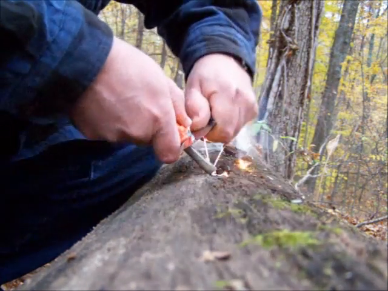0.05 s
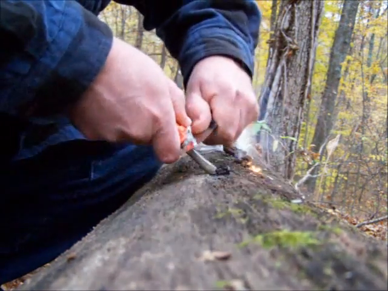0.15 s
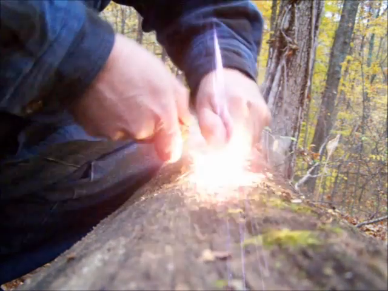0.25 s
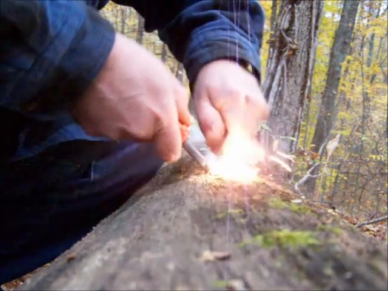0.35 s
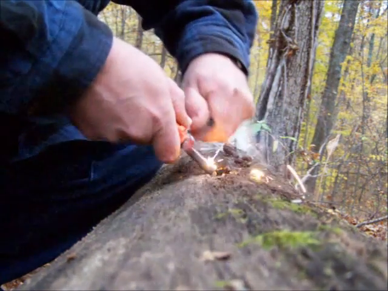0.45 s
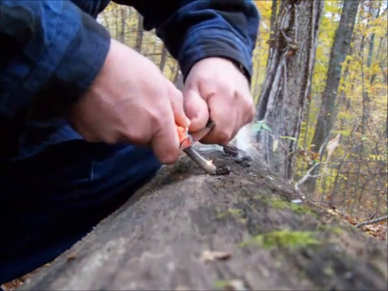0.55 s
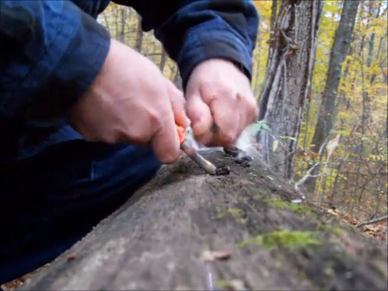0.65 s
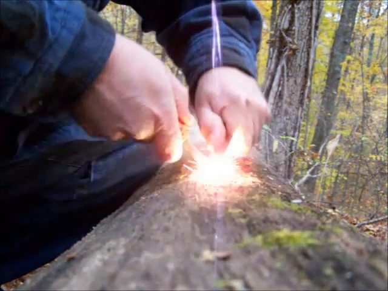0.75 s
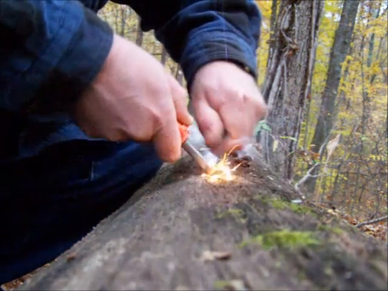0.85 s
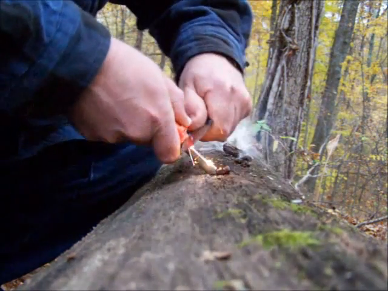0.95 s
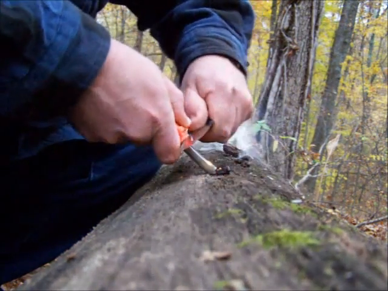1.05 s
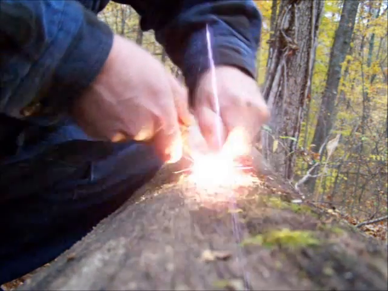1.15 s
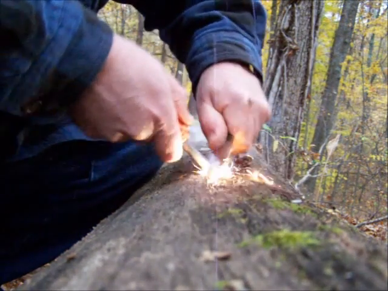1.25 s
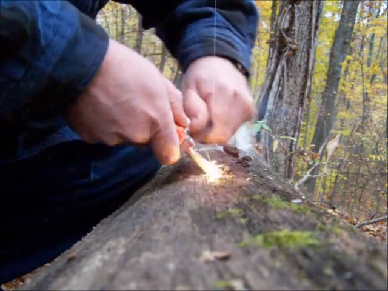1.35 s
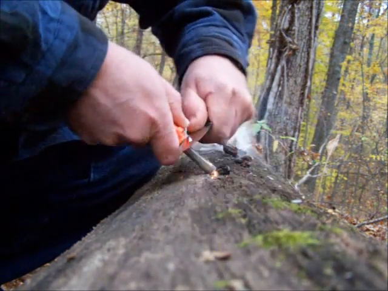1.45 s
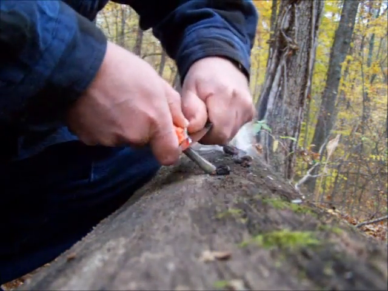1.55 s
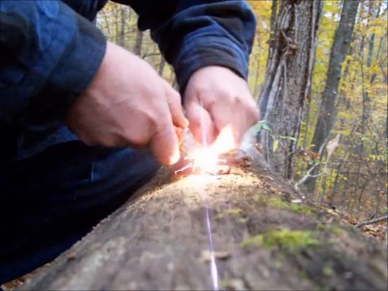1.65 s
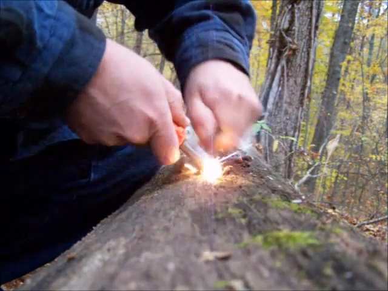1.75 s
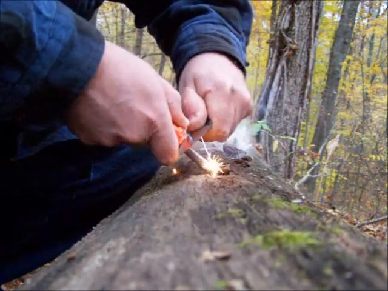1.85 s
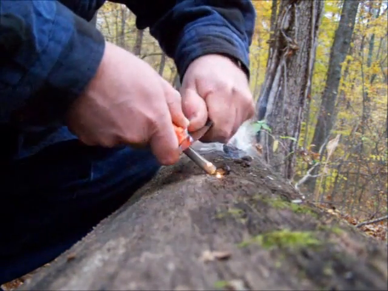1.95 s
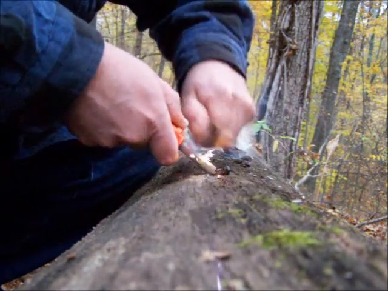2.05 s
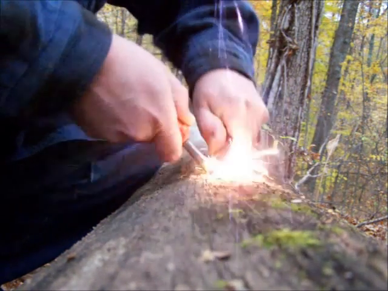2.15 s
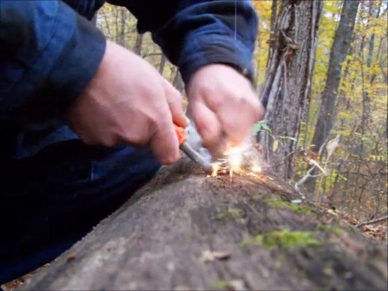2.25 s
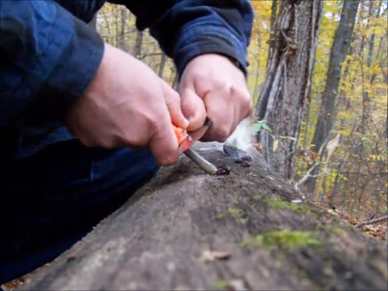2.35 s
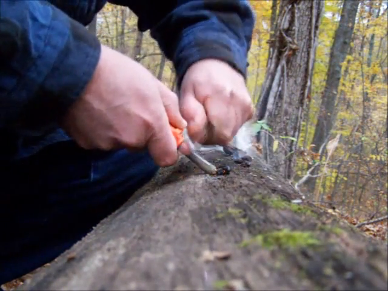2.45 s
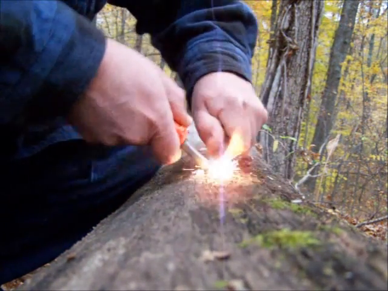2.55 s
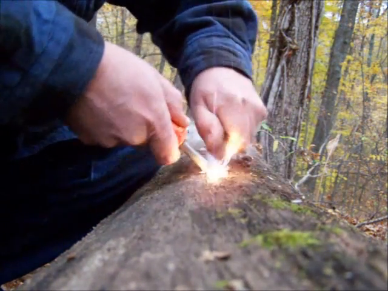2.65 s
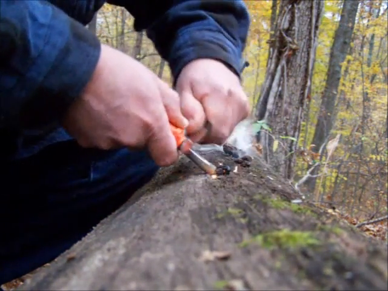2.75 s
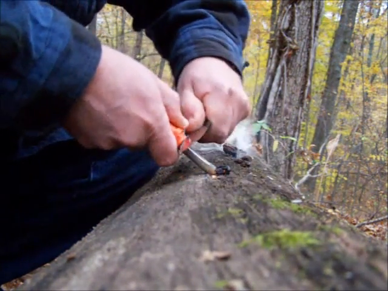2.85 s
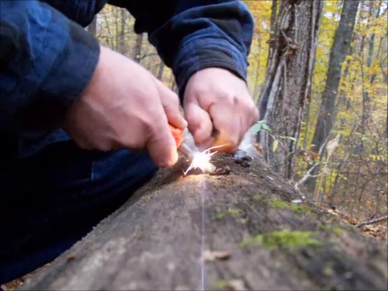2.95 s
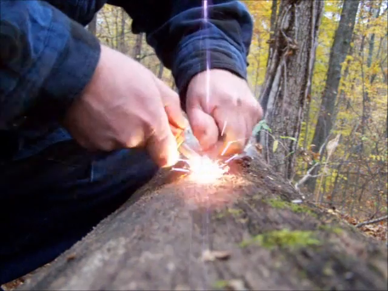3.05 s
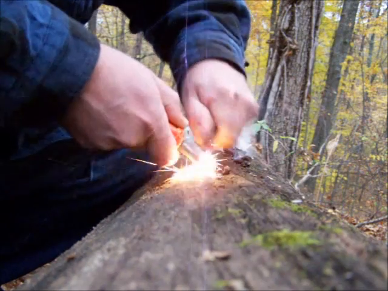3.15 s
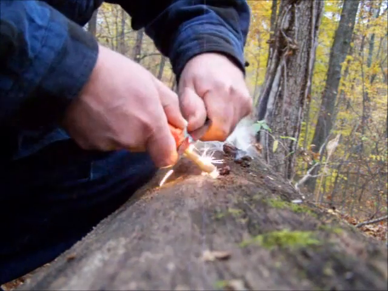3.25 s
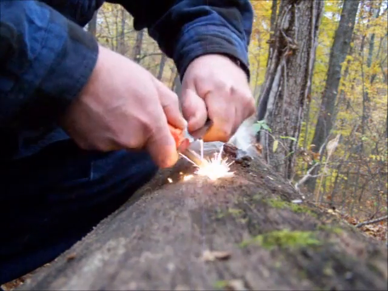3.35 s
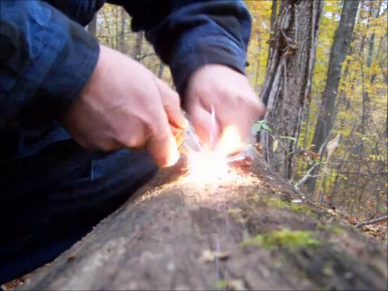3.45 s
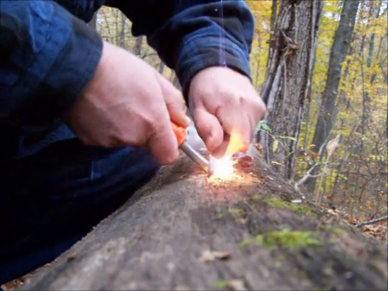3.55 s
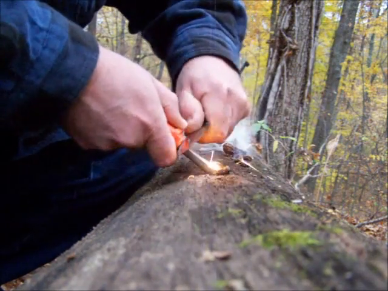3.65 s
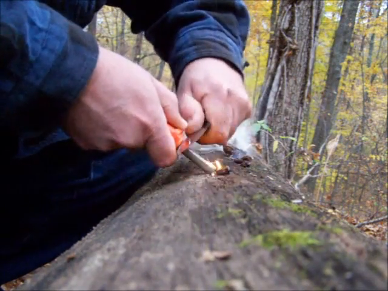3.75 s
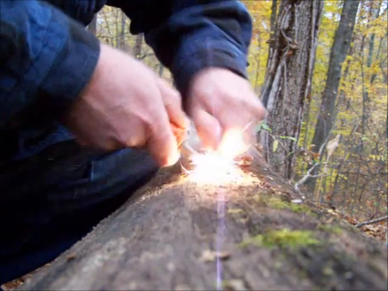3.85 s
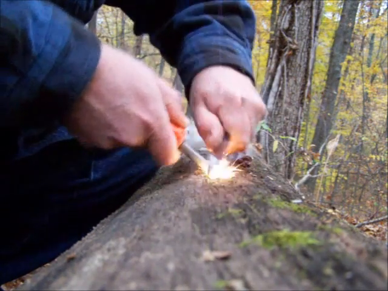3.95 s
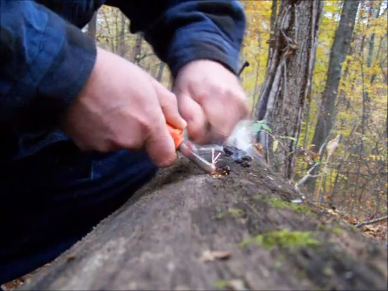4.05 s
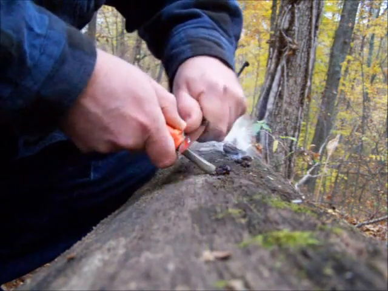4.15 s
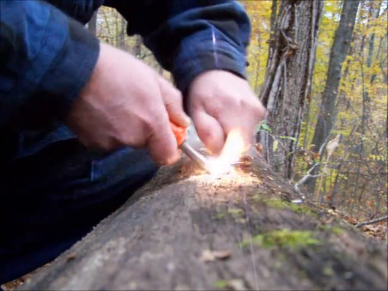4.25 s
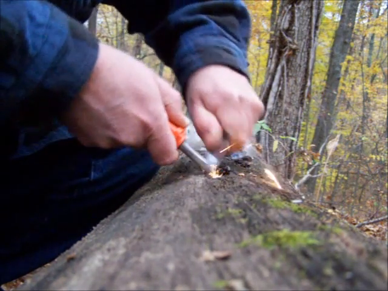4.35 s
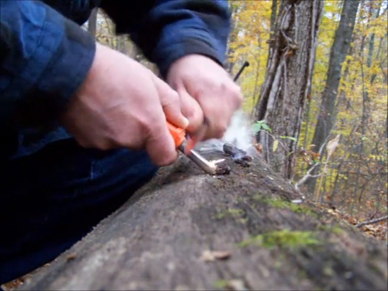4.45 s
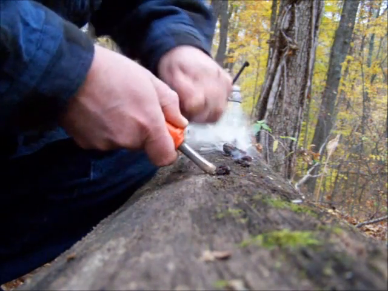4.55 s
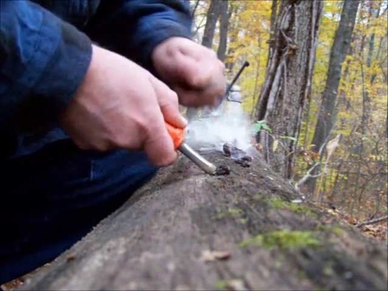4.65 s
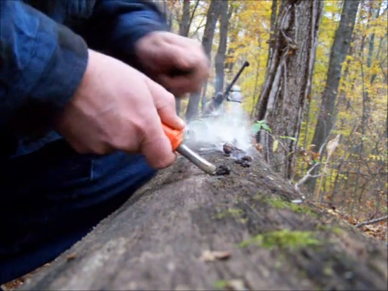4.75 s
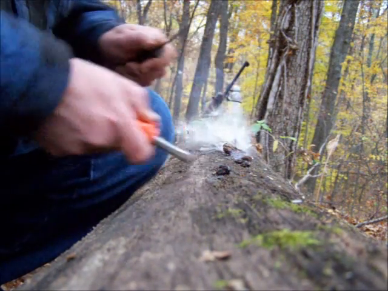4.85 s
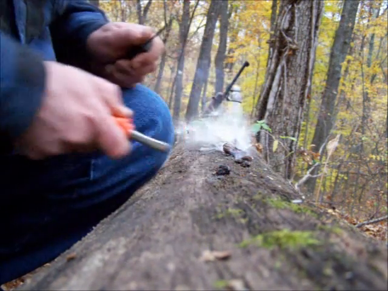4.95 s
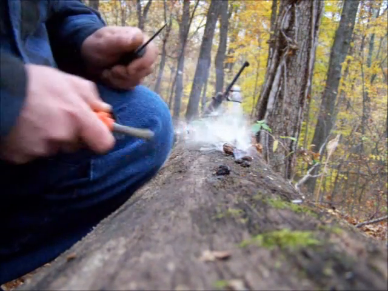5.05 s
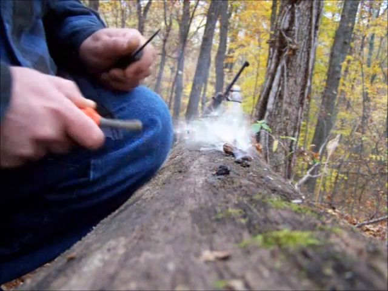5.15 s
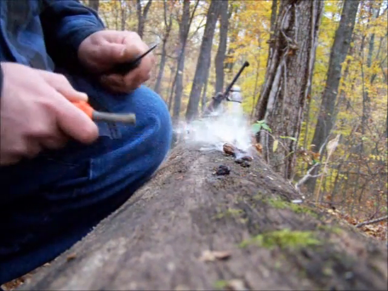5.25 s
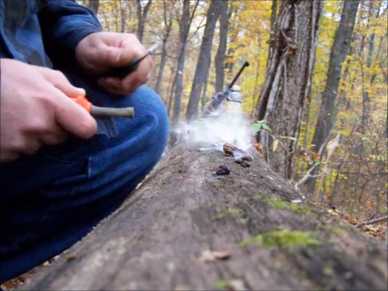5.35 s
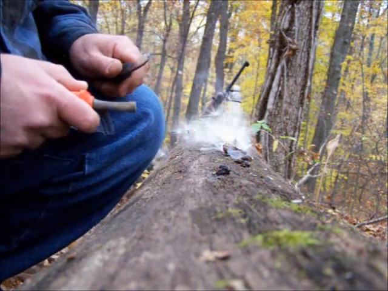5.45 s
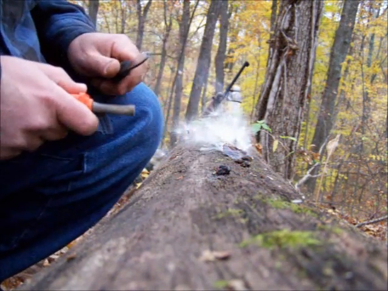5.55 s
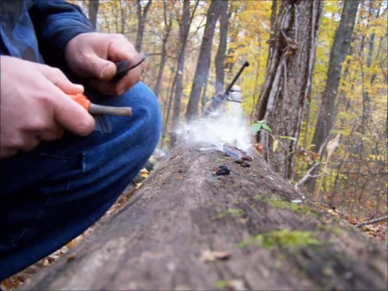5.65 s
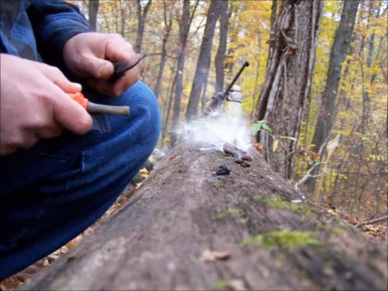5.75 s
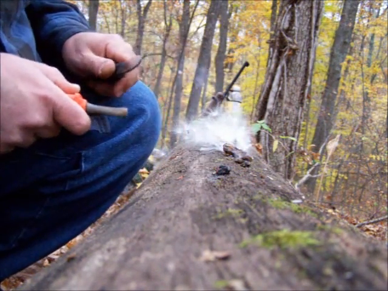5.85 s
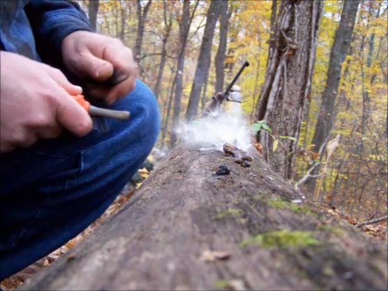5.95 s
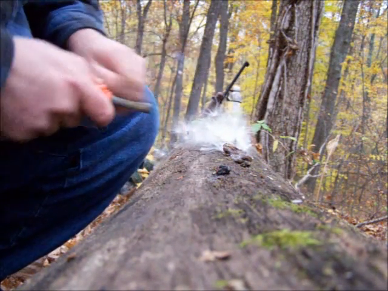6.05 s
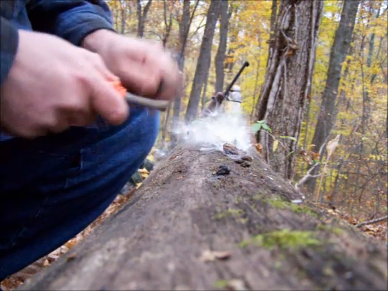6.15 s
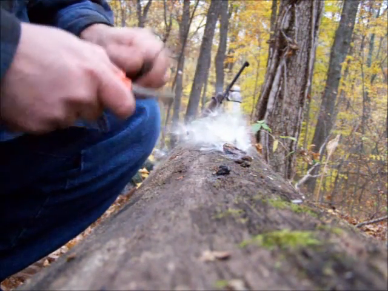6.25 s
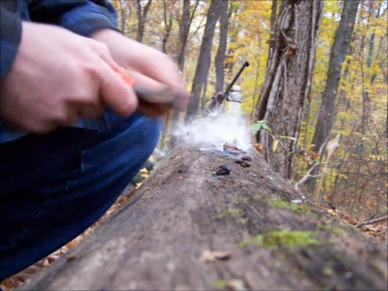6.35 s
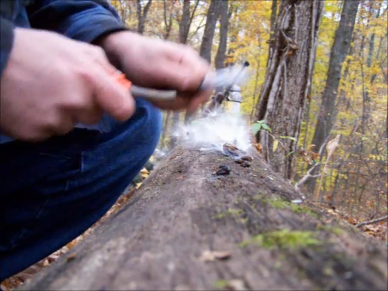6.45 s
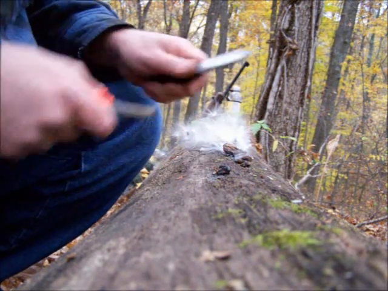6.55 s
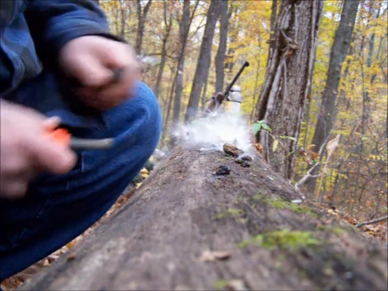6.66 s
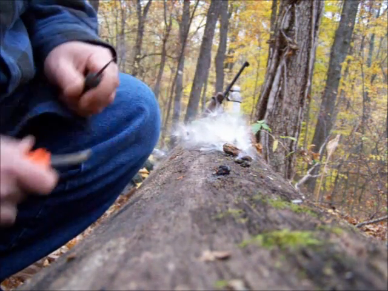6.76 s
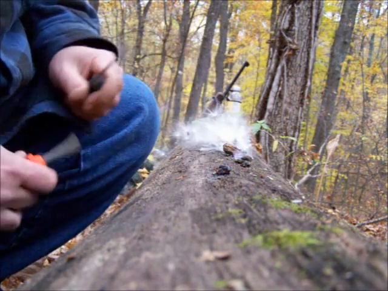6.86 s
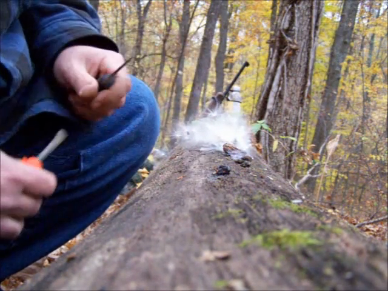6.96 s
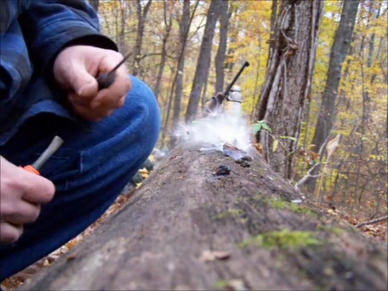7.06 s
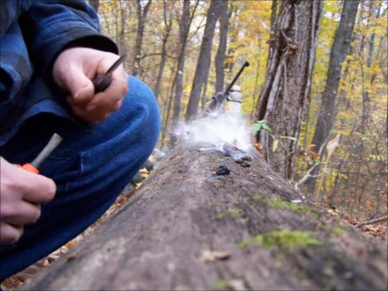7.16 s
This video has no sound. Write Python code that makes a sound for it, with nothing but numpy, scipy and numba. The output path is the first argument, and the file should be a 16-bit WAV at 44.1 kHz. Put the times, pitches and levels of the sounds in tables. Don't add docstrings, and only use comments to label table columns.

```python
import sys
import numpy as np
from scipy import signal
from scipy.io import wavfile
from scipy.ndimage import uniform_filter1d
from numba import njit

SR = 44100
rng = np.random.default_rng(int(sys.argv[2]) if len(sys.argv) > 2 else 0)


def undo_db(level):
    steps = np.asarray(level, float) / 20
    return 10 ** steps


def persist_wave(psi):
    counts = np.round(np.clip(psi, -1, 1) * 32767).astype(np.int16)
    wavfile.write(sys.argv[1], SR, np.atleast_2d(counts).T)


N = 318402


def unit(x):
    return x / np.sqrt(np.mean(x ** 2) + 1e-20)


def in_time(rows):
    s, *columns = np.transpose(rows)
    return [np.interp(np.arange(N) / SR, s, column) for column in columns]


def drift(rate_hz):
    r = np.exp(-40 * np.pi * rate_hz / SR)
    noise = rng.standard_normal(N // 20 + 3002)
    slow = signal.lfilter([1], [1, -2 * r, r * r], noise)[3000:]
    return np.interp(np.arange(N) / 20, np.arange(len(slow)), unit(slow))


def resonance(x, hz, width_hz):
    r = np.exp(-np.pi * width_hz / SR)
    poles = [1, -2 * r * np.cos(2 * np.pi * hz / SR), r * r]
    return signal.lfilter([(1 - r * r) / 2, 0, (r * r - 1) / 2], poles, x)


def twice(x, hz, width_hz):
    return resonance(resonance(x, hz, width_hz), hz, width_hz)


@njit
def gliding(x, hz, r, sr):
    y = np.zeros(len(x))
    for i in range(2, len(x)):
        y[i] = x[i] - x[i - 2] + 2 * r * np.cos(2 * np.pi * hz[i] / sr) * y[i - 1] - r * r * y[i - 2]
    return y


def body(x, modes, patchy_db):
    total = 0
    for k, (hz, width_hz, db) in enumerate(modes):
        share = undo_db(db + patchy_db * drift(17.7))
        total = total + (-1) ** k * share * twice(x, hz, width_hz)
    return unit(total)


def grains(per_s, spread_db, slip_db):
    sizes = undo_db(spread_db * np.minimum(rng.exponential(1, N), 4)) * rng.choice([-1, 1], N)
    caught = rng.random(N) < per_s / SR
    return unit(sizes * caught * undo_db(slip_db * drift(70))) + 1e-18


def steadied(x):
    power = uniform_filter1d(x * x, size=round(.025 * SR))
    return unit(x / (power + .05) ** .35)


ATTACK_S, RELEASE_S, OFF_DB = .016, .024, -50
SWELL_TIME = .66


def stroked(strokes, swell, ease_db_per_s, *shares):
    t = np.arange(N) / SR
    curves = np.full((1 + len(shares), N), -120.)
    curves[1:] = np.transpose([np.transpose(shares)[0]])
    for bite, top, lift, bite_db, top_db in strokes:
        now = np.flatnonzero((t > bite - ATTACK_S) & (t < lift + RELEASE_S))
        times = [bite - ATTACK_S, bite, bite + SWELL_TIME * (top - bite), top, lift, lift + RELEASE_S]
        bend_db = bite_db + swell * (top_db - bite_db)
        lift_db = top_db - ease_db_per_s * (lift - top)
        db = np.interp(t[now], times, [OFF_DB, bite_db, bend_db, top_db, lift_db, OFF_DB])
        followers = [np.interp(t[now], [bite, top, lift], share) for share in shares]
        leads = db > curves[0, now]
        curves[:, now[leads]] = np.array([db, *followers])[:, leads]
    return curves


# (bite [s], hardest [s], lift [s], bite level [dB], hardest level [dB])
PUSHES = [ (0.05, 0.104, 0.16, -32.5, -17), (0.506, 0.612, 0.685, -34.5, -18.5),
          (1.005, 1.065, 1.1, -29.5, -17.5), (1.112, 1.144, 1.16, -25.5, -24.5),
          (1.445, 1.555, 1.58, -23, -19.5), (1.6, 1.62, 1.623, -32, -30), (1.911, 1.962, 2.022, -24.5, -16),
          (2.347, 2.418, 2.5, -29, -17.5), (2.803, 2.948, 2.966, -26, -21.5),
          (3.178, 3.222, 3.24, -26.5, -28), (3.246, 3.307, 3.35, -26, -16.5),
          (3.683, 3.74, 3.8, -21.5, -18.5), (4.088, 4.17, 4.19, -24, -21.5)]
# (pitch [Hz], width [Hz], level [dB])
PUSH_MODES = [(2296, 530, -5), (2740, 450, -9), (3184, 420, -2), (3880, 310, 0.5), (4357, 590, 0.5)]
# (pitch [Hz], width [Hz], level [dB])
LOG_MODES = [(298, 460, -5.5), (620, 420, -4.5), (1063, 670, 0.5), (1598, 470, 4)]
# (pitch [Hz], width [Hz], level [dB])
GRIT_MODES = [(5500, 700, 0), (6300, 800, -3), (7250, 900, -6.5)]
PUSH_LOG_DB, PUSH_GRIT_DB = (-20, -14, -6.5), (-11.5, -6, -3)
ROD_HZ, ROD_DB = (3400, 3130, 3400), (-14, -5, -11)


def pushes():
    steel_db, log_db, grit_db, rod_hz, rod_db = stroked(
        PUSHES, .62, 230.5, PUSH_LOG_DB, PUSH_GRIT_DB, ROD_HZ, ROD_DB)
    bite = steadied(grains(per_s=4500, spread_db=3.2, slip_db=1.4))
    rod = unit(gliding(bite, rod_hz, np.exp(-np.pi * 170 / SR), SR))
    steel = unit(body(bite, PUSH_MODES, patchy_db=1.8) + undo_db(rod_db) * rod)
    log = undo_db(log_db) * body(bite, LOG_MODES, patchy_db=1.8)
    grit = undo_db(grit_db) * body(bite, GRIT_MODES, patchy_db=1.8)
    return undo_db(steel_db) * (steel + log - grit)


# (touch [s], hardest [s], lift [s], touch level [dB], hardest level [dB])
DRAGS = [ (0.19, 0.272, 0.3, -33, -23), (0.727, 0.772, 0.797, -30, -19.5),
         (1.165, 1.228, 1.25, -29.5, -15.5), (1.646, 1.705, 1.735, -27.5, -14.5),
         (1.755, 1.77, 1.78, -36, -33), (2.082, 2.15, 2.172, -28, -18.5), (2.516, 2.6, 2.632, -28, -19.5),
         (3.022, 3.095, 3.125, -24, -23), (3.425, 3.478, 3.5, -25, -19.5), (3.5, 3.51, 3.53, -27, -27),
         (3.38, 3.39, 3.4, -36, -34), (3.606, 3.616, 3.635, -37.5, -34.5), (3.818, 3.912, 3.92, -33.5, -21),
         (4.262, 4.322, 4.32, -28.5, -20.5)]
# (pitch [Hz], width [Hz], level [dB])
DRAG_MODES = [(2960, 460, -4.5), (3490, 360, 2), (3830, 350, 6), (4390, 520, 2.5)]
# (pitch [Hz], width [Hz], level [dB])
HANDLE_MODES = [(1300, 900, -9), (2170, 450, 0), (2600, 500, -1)]
DRAG_HANDLE_DB, DRAG_GRIT_DB = (-5.5, -13, -10), (-4.5, -14, -15)


def drags():
    steel_db, handle_db, grit_db = stroked(DRAGS, .3, 380, DRAG_HANDLE_DB, DRAG_GRIT_DB)
    rub = steadied(grains(per_s=8000, spread_db=2.2, slip_db=.6))
    handle = undo_db(handle_db) * body(rub, HANDLE_MODES, patchy_db=1.5)
    grit = undo_db(grit_db) * body(rub, GRIT_MODES, patchy_db=4.5)
    return undo_db(steel_db) * (body(rub, DRAG_MODES, patchy_db=2.2) + handle - grit)


def fizz():
    t = np.arange(N) / SR
    fade_db_per_s = 30
    glow = 0
    for _, top, _, _, db in PUSHES:
        glow = glow + (t > top) * undo_db(db - fade_db_per_s * np.maximum(t - top, 0))
    crackle = grains(per_s=1600, spread_db=4.0, slip_db=3.0)
    return undo_db(-29) * glow * unit(twice(crackle, 6950, 3400))


# (time [s], peak level [dB], ring [Hz], low part [dB])
SPARKS = [(0.2013, -18.5, 3490, -9), (0.2746, -14.0, 3550, -9.5), (0.8231, -24.5, 4520, -17),
          (1.1163, -10.6, 4370, -13.5), (1.1458, -16.5, 4100, -10), (1.2183, -15, 3750, -17),
          (1.4448, -16, 3740, -23), (1.62, -4, 4230, -15.5), (1.6456, -17, 4290, -14),
          (1.959, -8, 4100, -12.5), (1.9771, -10.5, 3330, -16), (1.9858, -11, 3190, -16),
          (2.1468, -11.5, 4160, -16.5), (2.4777, -3.5, 4170, -14.5), (2.516, -21, 3900, -13),
          (2.9028, -11, 3730, -17), (2.9803, -13, 4500, -16), (3.0213, -11.0, 4310, -14),
          (3.1794, -11, 3900, -13), (3.2165, -12.5, 4200, -13), (3.4948, -4.2, 4150, -11),
          (3.7286, -9.5, 3960, -11), (3.7592, -9, 3130, -4), (4.1778, -12, 3530, 1),
          (4.217, -14, 4030, -12), (4.2182, -7, 4120, -16.5), (4.2661, -19.5, 4000, -17),
          (4.2735, -10.5, 4240, -20), (4.3206, -6.8, 3740, -17)]
# (time [s], peak level [dB], ring [Hz], low part [dB], high part [dB])
TICKS = [(4.4607, -20.6, 4200, -22, -11), (4.672, -27.5, 3830, -6.5, 0.5), (4.711, -15, 4000, -10, -13),
         (4.7555, -19.5, 3640, -21, -15), (4.7986, -12.5, 3870, -8, -23), (5.1336, -11.5, 3920, -8, -7.5),
         (5.414, -26.5, 3920, -14, -10.5), (5.816, -26.5, 3250, -9, -14), (5.8993, -18, 3420, -21, -10),
         (5.9403, -21, 3600, -11, -7), (6.6531, -15.0, 3770, -9, -15), (6.6594, -17.8, 3470, -11, -24),
         (6.6663, -18.5, 3290, -4, -21), (6.6996, -28.2, 3660, -12, -11), (6.7365, -29.5, 3810, -6, 1),
         (6.8541, -15.5, 3190, -11, -17.5), (6.982, -16.5, 3800, -21, -10), (6.9894, -18.5, 4000, -14, -9),
         (7.0665, -17, 4500, -5.1, -7), (7.1247, -22.1, 3570, -22, -17.5), (7.1325, -27, 3450, -17, -3.5),
         (7.142, -22.2, 3570, -27, -16), (7.1801, -15, 3400, -22, -20.5), (7.2135, -14, 3550, -5.1, -9.5)]
# (time [s], peak level [dB], ring [Hz], overtones [dB], 60 dB fade [s])
SNAPS = [
    (5.9722, 0.0, 3960, -13, 0.0049),
    (5.974, -4.0, 3830, -12, 0.0056),
    (5.9891, -7.0, 3880, -23, 0.02),
    (6.0153, -3.0, 3650, -11, 0.0087),
    (6.1882, 0.0, 4240, -4, 0.0056),
    (6.19, 0.0, 3350, -7, 0.0051),
    (6.214, -24, 1100, -6, 0.012),
    (6.219, -15, 2100, -5, 0.007),
    (6.2225, -10, 4900, -6, 0.007),
    (7.2178, -18.0, 3400, -17, 0.0073),
]
SPARK_T60_S, TICK_T60_S = 0.0023, 0.0034
SNAP_TILT_DB = 4


def blows():
    sparks = [(s, db, hz, low, -7.5 + 7 * (hz / 1000 - 4), SPARK_T60_S) for s, db, hz, low in SPARKS]
    ticks = [(*row, TICK_T60_S) for row in TICKS]
    snaps = [(s, db, hz, over - SNAP_TILT_DB, over + SNAP_TILT_DB, t60) for s, db, hz, over, t60 in SNAPS]
    return sparks + ticks + snaps


def clicks():
    out, t = np.zeros(N + 1024), np.arange(1024) / SR
    for s, peak_db, ring_hz, low_db, high_db, t60 in blows():
        debris = rng.standard_normal(1024) * undo_db(-60 * t / (t60 + .004))
        blow = (t == 0) + .1 * debris
        knock_hz, knock_width_hz = (1600, 420) if low_db > -5 else (1700, 1700)
        parts = [twice(blow, ring_hz, 3.6 / t60),
                 -twice(blow, knock_hz, knock_width_hz),
                 -twice(blow, 6100, 2600),
                 resonance(blow, 700, 1200)]
        ring, knock, high, thud = (part / np.abs(part).max() for part in parts)
        low = knock - .35 * thud
        click = ring + undo_db(low_db) * low + undo_db(high_db) * high
        out[round(s * SR) - 6:][:1024] += undo_db(peak_db + 2.5) * click
    return out[:N]


# (time [s], level [dB], ring [Hz])
SLIPS = [(5.978, -11.5, 4100), (5.983, -18, 4000), (5.989, -14, 3950), (5.995, -17, 3850), (6.0, -18, 3800),
         (6.006, -16, 3750), (6.011, -12, 3650), (6.019, -16, 3500), (6.025, -27, 3450), (6.191, -11, 3600),
         (6.202, -20, 4000), (6.207, -21, 4200), (6.212, -22, 4000), (6.217, -19, 3700), (6.223, -18, 3800),
         (6.228, -24, 3800)]
SLIP_RISE_S, SLIP_FADE_DB_PER_S = .002, 1900


def blade():
    t = np.arange(N) / SR
    level = 0
    for s, db, _ in SLIPS:
        rise = np.clip((t - s) / SLIP_RISE_S + 1, 0, 1)
        level = level + rise * undo_db(db - SLIP_FADE_DB_PER_S * np.maximum(t - s, 0))
    _, ring_hz = in_time(SLIPS)
    rub = steadied(grains(per_s=8000, spread_db=1.8, slip_db=.4))
    r = np.exp(-np.pi * 550 / SR)
    ring = unit(gliding(gliding(rub, ring_hz, r, SR), ring_hz, r, SR))
    overtone = undo_db(-14) * unit(twice(rub, 5600, 600))
    handle = undo_db(-17) * unit(resonance(rub, 2100, 900))
    return level * (ring + overtone + handle)


# (start [s], end [s], start level [dB], end level [dB])
RUSTLE = [
    (4.528, 4.659, -54, -46),
    (4.681, 4.79, -38.5, -41),
    (4.805, 4.851, -33, -44),
    (4.87, 5.12, -36, -44.5),
    (5.152, 5.431, -52, -43.5),
    (5.44, 5.869, -43, -50.5),
    (6.682, 6.839, -46, -45),
    (6.87, 6.97, -47, -47),
    (7.005, 7.171, -48.5, -36),
    (7.192, 7.222, -41.5, -29.5),
]


def rustle():
    t = np.arange(N) / SR
    gate = sum(np.clip(np.minimum(t - start, end - t) / .003 + .5, 0, 1) for start, end, _, _ in RUSTLE)
    rows = np.array(RUSTLE)
    level_db = np.interp(t, rows[:, :2].ravel(), rows[:, 2:].ravel())
    crackle = grains(per_s=1500, spread_db=3.5, slip_db=2.5)
    bright = .12 * resonance(crackle, 6000, 2500)
    dull = .35 * resonance(crackle, 1900, 1500)
    return gate * undo_db(level_db) * unit(twice(crackle, 3900, 2400) + bright + dull)


# (time [s], 4th order level [dB], 8th order level [dB])
ENGINE = [(0.0, -42.3, -48.5), (0.45, -43, -54.5), (0.9, -40.6, -47), (1.2, -38, -54), (1.75, -36, -39.5),
          (2.4, -35.5, -46), (3.0, -40, -43.5), (3.35, -44.5, -51), (3.85, -44.5, -66), (4.5, -45, -50.5),
          (5.4, -51.5, -52), (6.2, -47, -57), (6.6, -41.5, -47), (7.22, -45, -43.5)]
# (multiple of the cycle [1], level [dB])
SIDE_ORDERS = [(5, -12), (7, -16), (9, -10), (11, -9), (12, -11), (13, -14)]
CYCLE_HZ = 74.3 / 4


def engine():
    fourth_db, eighth_db = in_time(ENGINE)
    turn = 2 * np.pi * np.cumsum(CYCLE_HZ * (1 + .001 * drift(.5))) / SR
    fourth = undo_db(fourth_db) * np.sin(4 * turn)
    eighth = undo_db(eighth_db + .6 * drift(12)) * np.sin(8 * turn - 2)
    load = undo_db((fourth_db + eighth_db) / 2)
    side = sum(undo_db(db - 5 + 3 * drift(1.5)) * np.sin(k * (turn + k)) for k, db in SIDE_ORDERS)
    return np.sqrt(2) * (fourth + eighth + load * side)


def coloured(spectrum, patchy_db):
    hz, db = np.transpose(spectrum)
    white, out = rng.standard_normal((2, N)), 0
    edges = 2 ** np.arange(np.log2(hz[0]), np.log2(min(hz[-1], 10000)), 1 / 5)
    for k, (low, high) in enumerate(zip(edges, edges[1:])):
        sos = signal.butter(2, [low, high], "band", fs=SR, output="sos")
        band = signal.sosfilt(sos, white[k % 2])
        band_db = np.interp(np.log(low * high) / 2, np.log(hz), db)
        out = out + band * undo_db(band_db + patchy_db * drift(8))
    return out


# (pitch [Hz], level [dB per Hz])
HISS = [(1200, -26.5), (1600, -13.5), (2100, -8.5), (2700, -4), (3200, 0), (3750, 2), (4400, -5),
        (5200, -7), (6200, -17), (7300, -36), (9000, -49)]
# (pitch [Hz], level [dB per Hz])
RUMBLE = [(25, -7), (45, -5.5), (100, .5), (200, .5), (300, -4.5), (500, -1.5), (900, -6), (1300, -4),
          (2200, -22)]
# (time [s], leaves level [dB], shifting level [dB])
BREEZE = [
    (0.0, -34.5, -2),
    (0.3, -37.3, 0),
    (1.6, -37.5, 2),
    (2.8, -37.5, -1.5),
    (3.1, -34, 1),
    (3.9, -37, 1.5),
    (6.2, -35.5, -1),
    (6.55, -35.5, 3.5),
    (7.22, -36, 0),
]


def wood():
    hiss_db, shift_db = in_time(BREEZE)
    engine_db, _ = in_time(ENGINE)
    crackle = unit(resonance(grains(per_s=300, spread_db=2.5, slip_db=3.0), 4200, 3000))
    hiss = unit(coloured(HISS, patchy_db=.8)) + undo_db(-16) * crackle
    rumble_db = -44.7 + shift_db + .1 * (engine_db - engine_db.mean())
    return undo_db(hiss_db) * hiss + undo_db(rumble_db) * unit(coloured(RUMBLE, patchy_db=2.1))


def scene():
    striker = pushes() + drags() + fizz()
    handling = clicks() + blade() + rustle()
    return np.tile(striker + handling + engine() + wood(), (2, 1))


def low_pass(x):
    return signal.sosfilt(signal.butter(12, 8280, fs=SR, output="sos"), x)


def record(dry):
    level_db = 20 * np.log10(np.abs(dry[0]) + 1e-6)
    fall_db = 60 * np.arange(N) / SR
    held_db = np.maximum.accumulate(level_db + fall_db) - fall_db
    wanted_db = -.5 * np.maximum(held_db + 3, 0)
    duck_db = signal.lfilter([.004], [1, -.996], wanted_db)
    band = signal.cheby1(10, .3, 7540, fs=SR, output="sos")
    narrow = signal.sosfilt(band, dry * undo_db(duck_db))
    return low_pass(np.clip(narrow, -1, 1))


dry = scene()
out = record(dry)
persist_wave(out)
```